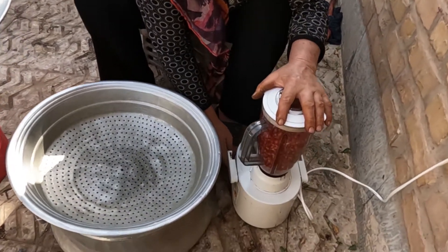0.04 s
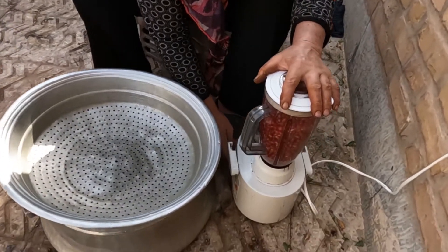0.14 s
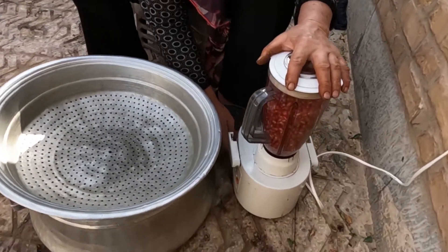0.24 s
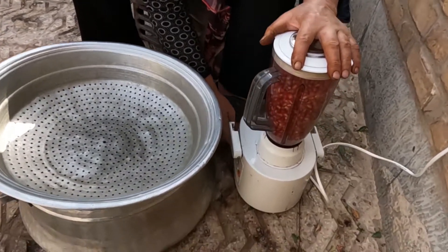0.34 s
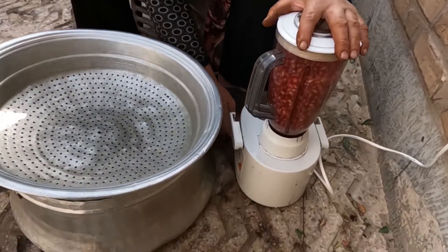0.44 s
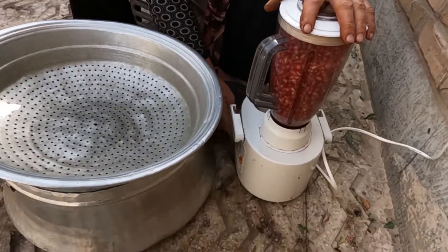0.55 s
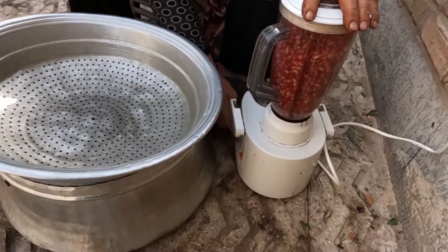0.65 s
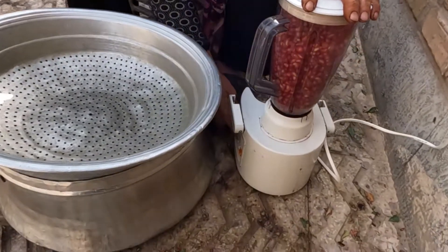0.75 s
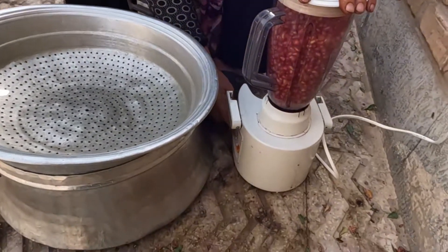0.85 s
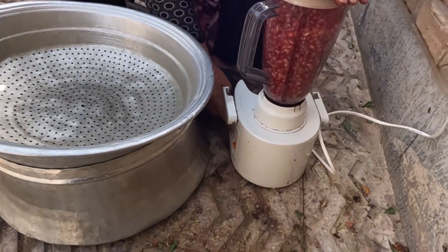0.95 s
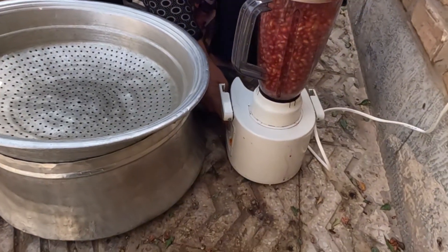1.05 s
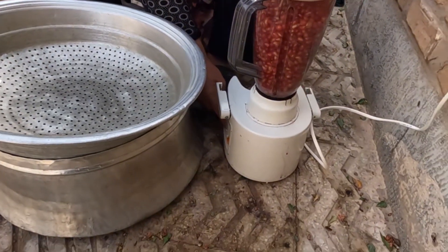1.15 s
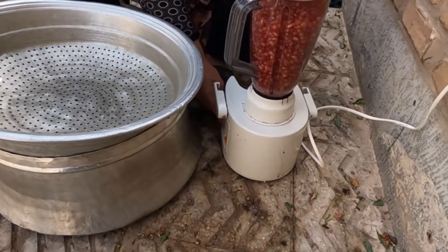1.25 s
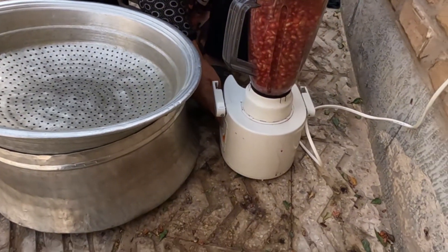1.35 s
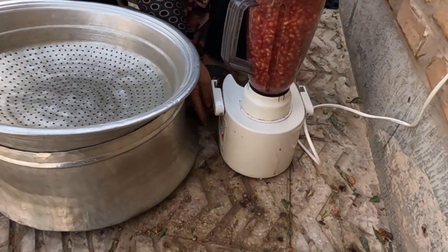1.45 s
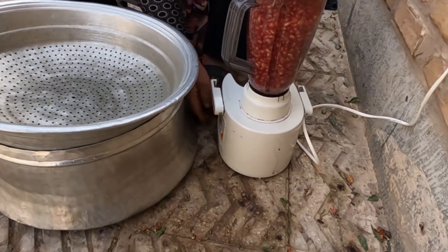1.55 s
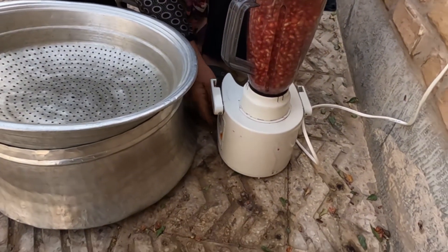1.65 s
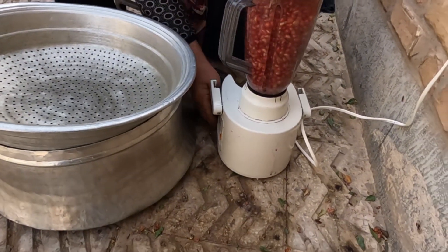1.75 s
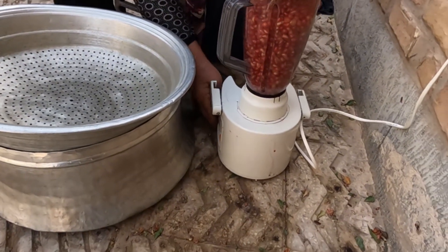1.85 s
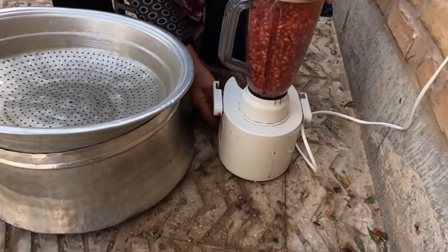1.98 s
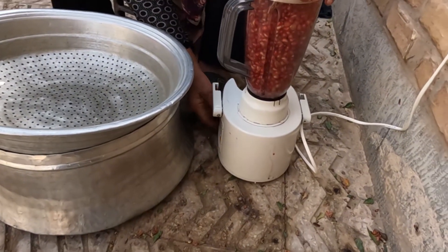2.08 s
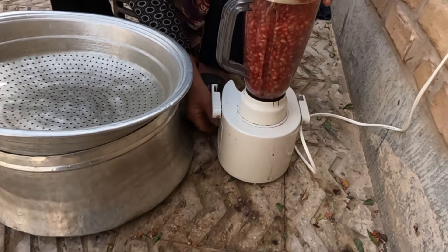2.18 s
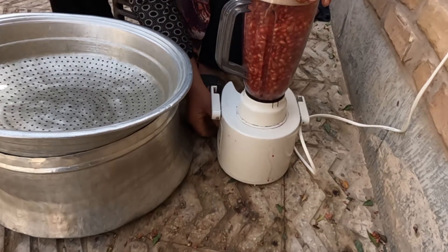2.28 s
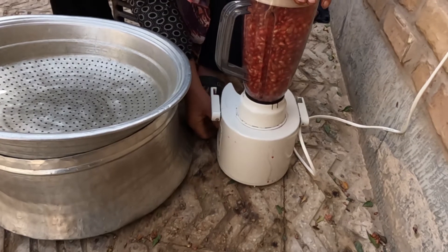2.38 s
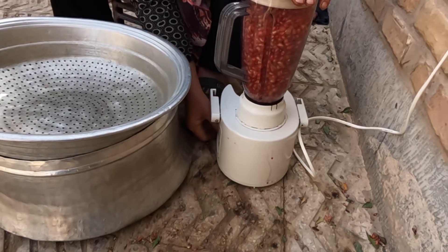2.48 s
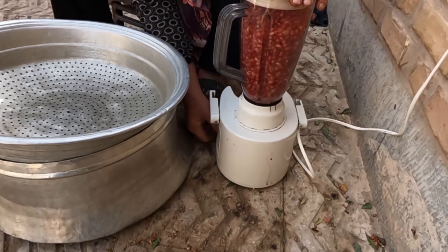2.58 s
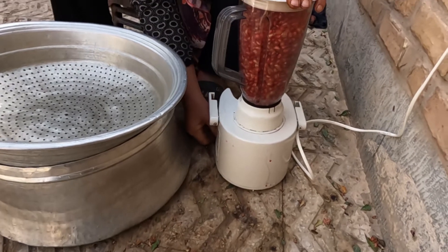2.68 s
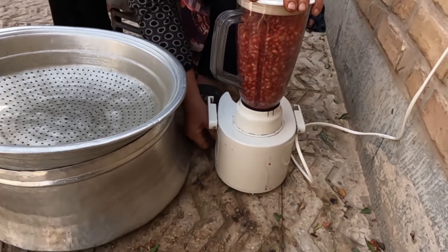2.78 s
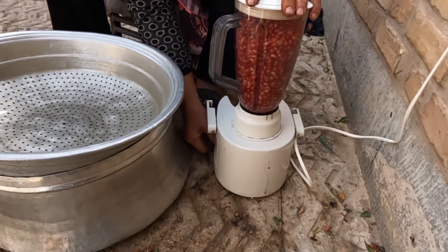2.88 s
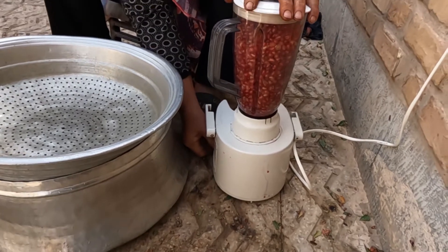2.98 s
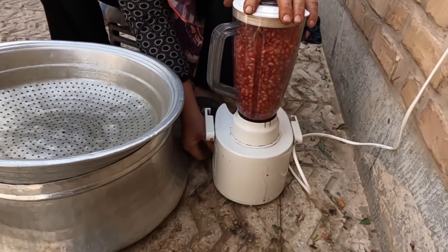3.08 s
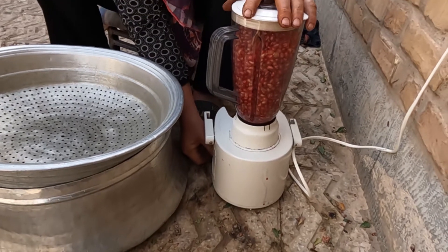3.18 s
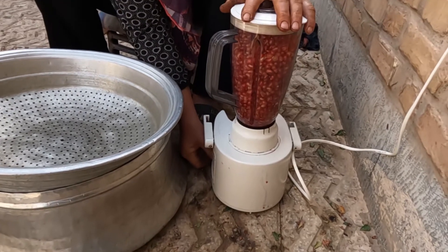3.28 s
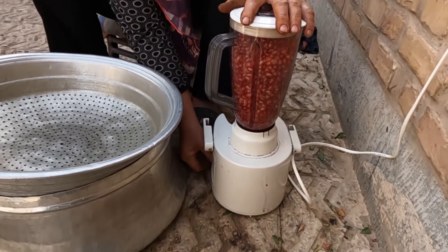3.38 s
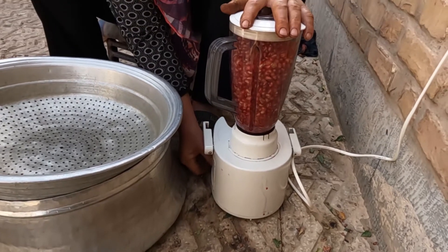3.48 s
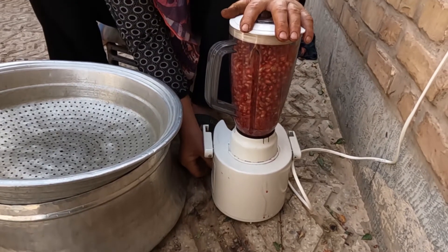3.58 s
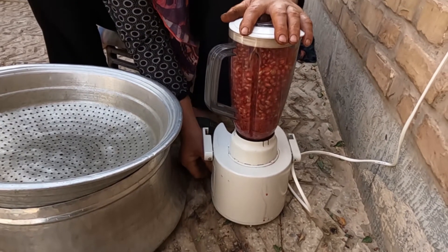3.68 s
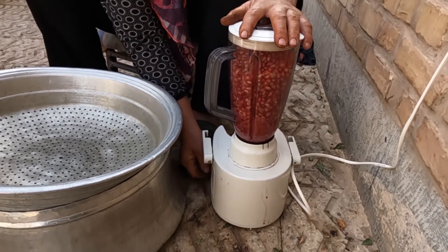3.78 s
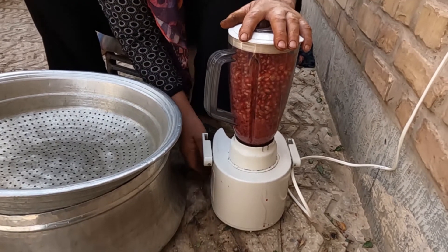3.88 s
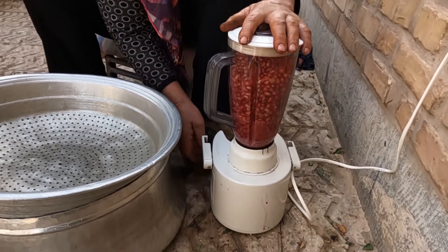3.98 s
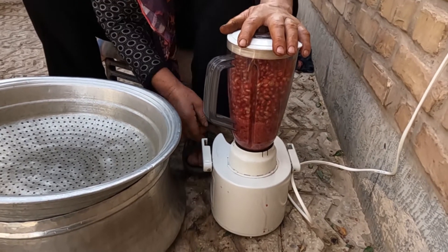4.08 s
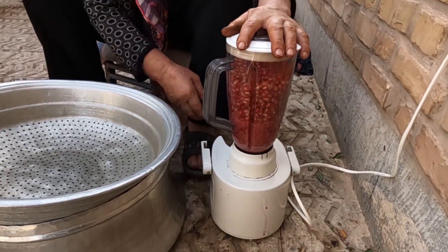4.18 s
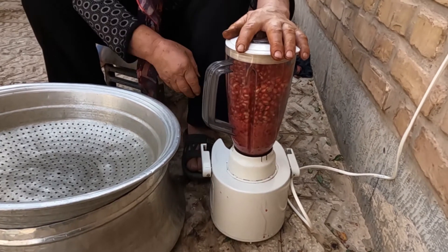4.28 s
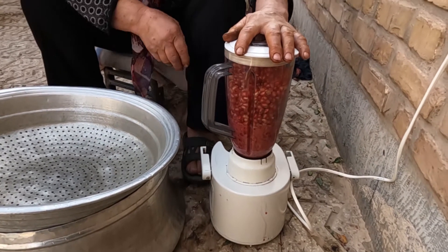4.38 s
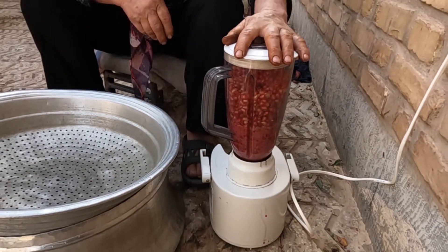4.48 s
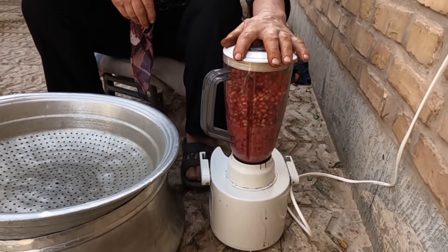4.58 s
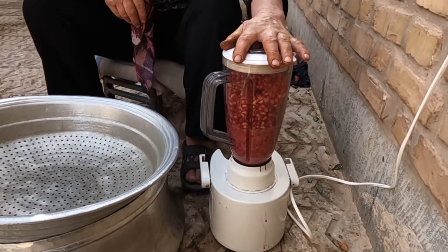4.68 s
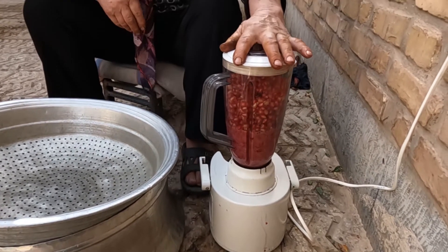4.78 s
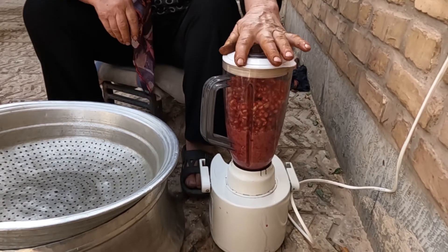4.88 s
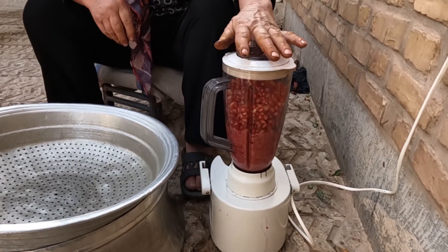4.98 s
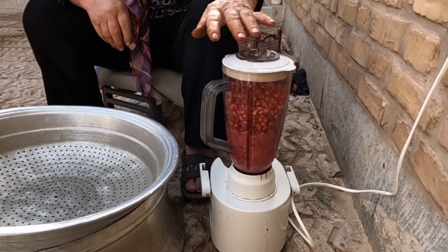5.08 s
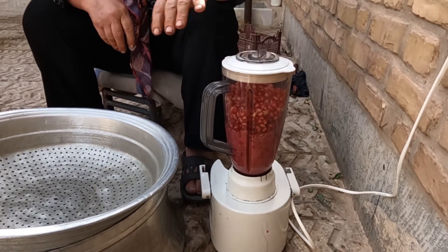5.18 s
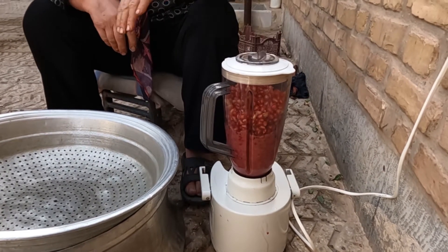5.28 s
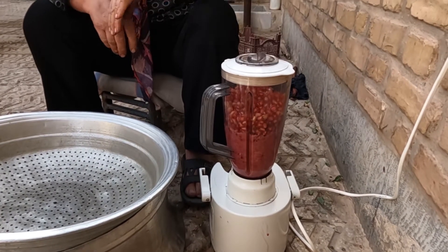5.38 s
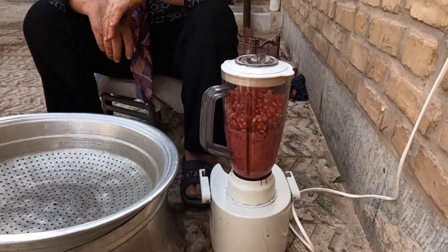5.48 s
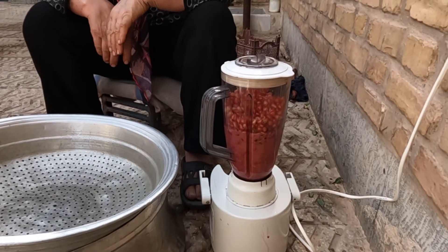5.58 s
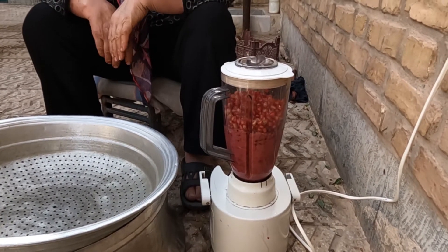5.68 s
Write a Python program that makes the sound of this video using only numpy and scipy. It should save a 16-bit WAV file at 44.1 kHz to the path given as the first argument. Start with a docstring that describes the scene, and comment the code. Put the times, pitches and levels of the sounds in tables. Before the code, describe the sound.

A close stereo outdoor scene in a small paved yard with hard walls and a short diffuse echo. For the first second there is mainly low, gusty wind rumble and a faint distant wash, with barely audible ticks. From about 1.0 to 1.3 seconds the plastic jar clacks on its heavy base, strongest near 1.25, with soft rubs and dull low bumps. Sparser knocks and scrapes follow, with another cluster around 1.8 to 2.1 and small taps at 2.3 and 2.5. A crisp switch snap comes at 2.65, then a hard jolt at 2.81 as the motor jerks into life. It instantly becomes a very loud, rough roar: chopping blades, dense seed crackle, bright spray and brush whirr, with tiny dips before 3.3. From 4 seconds the pulp thickens, the motor's pitch slides down by about a third, and low churning and drone swell, continuing to the end around 5.75.

```python
"""In a paved yard beside a brick wall, a blender full of fruit stands close to a two-port microphone.
Hands shift the jar: knocks and rubs are noise bursts and slips ringing the housing and base, bumps are short tones.
The switch snaps its panel; then blade chops, seed impacts, splinters and brush whirr ring the filled jar.
Thickening pulp slows the motor and raises the churning noise and the drone of the shaft.
Behind it a breeze rumbles on the microphone over a faint wash, both shaped noise; the yard adds a short echo."""
import sys
import numpy as np
from scipy import signal
from scipy.fft import rfft, irfft, next_fast_len
from scipy.io import wavfile
from scipy.ndimage import uniform_filter1d, map_coordinates

SR = 44100
rng = np.random.default_rng(int(sys.argv[2]) if len(sys.argv) > 2 else 0)


def persist_wave(psi):
    """Save psi, clipped to +-1, as 16-bit WAV."""
    counts = np.round(np.clip(psi, -1, 1) * 32767).astype(np.int16)
    wavfile.write(sys.argv[1], SR, np.atleast_2d(counts).T)


N = 253134

# lid and plastic housing, struck from outside: (resonance [Hz], width [Hz], level [dB])
SHELL_MODES = [(630, 81, 7.5), (958, 160, 8), (1143, 260, 5.5), (1356, 53, -2.5), (1620, 1350, -3),
               (2073, 57, -2.5), (2240, 110, 1), (2720, 370, -6), (3000, 120, -1), (3300, 2600, -4.5),
               (4650, 910, -11), (5580, 1700, -8), (7100, 1300, -11.5), (10600, 4000, -17)]
# the heavy base rocking on the paving: (resonance [Hz], width [Hz], level [dB])
BASE_MODES = [(99, 64, -3), (189, 140, -7), (288.4, 63, 4.5), (375, 140, -29), (543, 340, -13.5)]


def blender():
    """The motor turns blades that shred the fruit and churn the pulp; thickness steers both."""
    thick, age, speed, angle = motor()
    # the whole load is first thrown round: 7.5 dB around 2.915 s
    heave_db = 7.5 * swell(np.arange(N) / SR, middle=2.915, length=0.041)
    running = np.clip(age / 0.034, 0, 1)
    shredded = sloshing(shredding(thick, age, speed, angle, heave_db))
    return running * (shredded + churning(thick, angle, heave_db))


def motor():
    """The shaft spins up exponentially and sags under thick pulp; its angle is the sum of its speed."""
    # the fruit turns to pulp, which loads the motor: (time [s], thickness [0-1])
    thickness = [(3.95, 0.01), (4.45, 0.4), (5.15, .87), (5.75, 0.98)]
    start_s, spin_up_s = 2.815, 0.028
    free_turns_per_s, sag_share = 152, 0.36  # speed in loose fruit, share lost in thick pulp
    thick = curve(thickness)
    age = np.maximum(np.arange(N) / SR - start_s, 0)  # seconds since the motor got current
    speed = free_turns_per_s * (1 - np.exp(-age / spin_up_s)) * (1 - sag_share * thick)
    uneven_speed = speed * (1 + 0.01116 * wobble(14))  # lumps make the shaft waver
    angle = 2 * np.pi * np.cumsum(uneven_speed) / SR
    return thick, age, speed, angle


def shredding(thick, age, speed, angle, heave_db):
    """Blades chop at every pass, seeds pelt the wall and splinters spray, each ringing a band of the filled jar."""
    # the filled jar, driven from inside: (resonance [Hz], width [Hz], level [dB])
    jar_modes = [(274, 106, -1.5), (532, 79, -7.5), (660, 310, -10.5), (948, 167, -4), (1043, 76, -3.5),
                 (1173, 170, -3), (1290, 98, -12), (1411, 316, -3), (1742, 96, -5), (2017, 380, -4),
                 (2186, 196, -2.5), (2600, 510, -2.5), (3060, 360, -0.8), (3296, 270, -0.5),
                 (3900, 1470, -10), (5380, 1160, -7.5), (6050, 900, -8.5), (7350, 1360, -11.5),
                 (9540, 2400, -20), (10760, 2700, -20), (12900, 2000, -20)]
    t = np.arange(N) / SR
    grip_db = blade_grip(t, age)
    chop_db = -25 - 2.5 * thick + 0.58 * grip_db + 0.49 * heave_db
    seed_db = -21.5 - 0.5 * thick + grip_db
    seed_db += 1.6 * np.exp(-age / 0.29)  # whole seeds hit hardest
    spray_db = -31.5 - 4 * thick ** 4 + grip_db  # smothered only once the pulp is thick

    blades = 4
    chops = 0.62 * impacts(blades * speed, scatter=0.2, spread_db=0) + 0.5 * rng.standard_normal(N)
    seeds = impacts(np.full(N, 3500), scatter=2, spread_db=4)
    splinters = impacts(np.full(N, 1400), scatter=2, spread_db=6.5) + 1.37 * rng.standard_normal(N)
    rough = whirr(t, angle)
    clumps = amp(0.7 * np.tanh(wobble(110)))  # shared by all three bands

    def jar(x, low_hz, high_hz):
        """Fruit reaches the blades unevenly, partly in step with the shaft, before the jar rings."""
        morsels = amp(3.14 * np.tanh(wobble(220)))
        feed = clumps * morsels * (1 + 0.13 * np.cos(angle))
        return unit_while(through(feed * x, ringing(jar_modes, low_hz, high_hz)), age > 0)

    flesh = amp(chop_db) * jar(chops + rough, low_hz=340, high_hz=1890)
    crunch = amp(seed_db) * jar(seeds + 0.36 * chops + rough, low_hz=1730, high_hz=3950)
    fizz = amp(spray_db) * jar(splinters + 0.5 * seeds + rough, low_hz=4400, high_hz=10700)
    return flesh + crunch + fizz


def blade_grip(t, age, bite_s=0.099, bite_db=23.5, surge_db=0.68):
    """How well the blades grip the fruit, in dB: it rises as fruit is drawn in, surges, and dips in air pockets."""
    # the blades briefly spin in an air pocket: (middle [s], length [s], level change [dB])
    pockets = [(3.046, 0.014, -6), (3.219, 0.0083, -5.5), (3.286, 0.015, -6)]
    grip_db = -bite_db * np.clip(1 - age / bite_s, 0, 1)
    grip_db += surge_db * wobble(21.916)
    for middle, length, db in pockets:
        grip_db += db * swell(t, middle, length)
    return grip_db


def whirr(t, angle, level=0.39, size=320):
    """Brushes and coupling repeat a rough pattern at every turn, which changes slowly as time passes."""
    pattern = rng.standard_normal((size, size))
    turns = angle / (2 * np.pi)
    # rows pass at 3 a second, columns once round per turn
    return level * unit(map_coordinates(pattern, [3 * t, turns * size], mode="grid-wrap"))


def churning(thick, angle, heave_db):
    """The churning mass is low noise plus the drone of the unbalanced rotor, louder in thick pulp."""
    # unbalance of the blades: (shaft order [1], level against the churning [dB])
    whirl = [(1, -9.5), (2, -16.5), (3, -7.5), (4, -15), (5, -11)]
    # colour of the churning pulp: (frequency [Hz], relative level [dB per Hz])
    pulp_colour = [(25, -47), (50, -14.5), (100, -11), (150, -5), (210, -7.5), (285, 1.5), (340, -5),
                   (420, -10), (700, -13), (1500, -78)]
    churn_db = -37 + 9 * thick ** 1.4 + heave_db
    pulp = amp(wobble(7.3)) * noise(pulp_colour)
    drone = sum(amp(db + 2.3 * wobble(8.3)) * np.cos(order * angle) for order, db in whirl)
    return amp(churn_db) * (pulp + drone)


def sloshing(x, depth_db=1.0):
    """Pulp thrown along the wall damps now one resonance, now another."""
    z = signal.stft(x, nperseg=1024)[2]
    field = rng.standard_normal(z.shape)
    field = uniform_filter1d(field, size=4, axis=0)  # smooth over frequency
    field = uniform_filter1d(field, size=6, axis=1)  # and over time
    return signal.istft(z * amp(depth_db * unit(field)), nperseg=1024)[1][:N]


def switch(trim_db=1):
    """The sprung switch rings its panel."""
    # the switch snaps over and rebounds: (time [s], level before trim [dB], t60 [s])
    snaps = [(2.642, -12.5, 0.028), (2.661, -24.5, 0.047)]
    # the switch and its panel: (resonance [Hz], width [Hz], level [dB])
    panel_modes = [(280, 120, -2), (613, 430, -10), (1380, 330, 1.5), (2210, 320, 2), (3020, 890, -6),
                   (3570, 1400, -9.5), (5570, 1200, -15), (10200, 5000, -32)]
    panel = ringing(panel_modes, 130, 13000)
    out = np.zeros(N)
    for s, db, t60 in snaps:
        snap = amp(db + trim_db) * burst(panel, t60)
        out[round(s * SR):][:len(snap)] += snap
    return out


def knocks(thump_trim_db=1.5, clack_trim_db=1.14, tick_trim_db=1, rattle_db=-24):
    """Each contact thumps the base, clacks the housing and ticks at the hard edge; the loose jar chatters on."""
    # the jar knocks on its base, last as the drive jerks it; levels before trim:
    # (time [s], thump [dB], clack [dB], tick [dB], clack centre [Hz])
    contacts = [(0.456, -71, -45.5, -60, 1440), (.522, -76, -49, -40.5, 4200), (0.756, -66, -54, -60, 2400),
                (0.977, -68, -50, -50, 3500), (1.007, -43, -26, -33, 2830), (1.082, -35.5, -26, -36, 2240),
                (1.135, -64, -43, -38.5, 3800), (1.177, -63, -52, -50, 3000), (1.201, -52, -39, -47, 2080),
                (1.249, -26.5, -19, -31.5, 2230), (1.305, -55, -45, -52, 3000),
                (1.433, -41.5, -43, -41, 2960), (1.744, -56, -52.5, -55, 2500),
                (1.804, -55, -48.5, -46, 2500), (1.896, -44, -37, -43, 2180),
                (1.929, -31.5, -28, -36, 1860), (1.948, -34, -36.5, -44, 2000),
                (2.312, -43.5, -36.5, -42, 2800), (2.515, -38, -39.5, -53, 1840),
                (2.775, -51, -38, -33.5, 2870), (2.805, -30, -33, -33, 2020), (2.813, -15, -12, -17, 2630),
                (2.826, -25.5, -16.5, -37, 1980)]
    base = ringing(BASE_MODES, 33, 930)
    wall = ringing(SHELL_MODES, 540, 5400)
    edge = ringing(SHELL_MODES, 5280, 13400)
    out = np.zeros(N)
    for s, thump, clack, tick, centre_hz in contacts:
        hit = amp(thump + thump_trim_db) * burst(base, t60=0.098)
        # the housing rings equally long after every knock
        hit += amp(clack + clack_trim_db) * burst(favour(wall, centre_hz, octaves=1.0), t60=0.045)
        hit += amp(tick + tick_trim_db) * burst(edge, t60=0.033)
        hit += amp(clack + rattle_db) * burst(favour(wall, 4200, octaves=1.4), t60=0.16)
        out[round(s * SR):][:len(hit)] += hit
    return out


def scraping(catches_per_s=90, catch_share=0.82, size=16384):
    """Every rub is a swell of tiny slips and a few harder catches that excite the housing and rock the base."""
    # the jar slides and rocks as it is settled; the bell of that length is squared below:
    # (middle [s], level [dB], bell length [s], centre [Hz], rocking of the base [dB])
    rubs = [(1.04, -50.5, .06, 2470, -60), (1.199, -57, 0.12, 3500, -65), (1.312, -72, 0.15, 4000, -56),
            (1.484, -55, 0.032, 1100, -51), (1.724, -61, 0.051, 3500, -58), (1.834, -49.5, .04, 2800, -41),
            (1.977, -52.5, 0.19, 2600, -47.5), (2.085, -46.5, 0.03, 2200, -39.5),
            (2.197, -50, 0.048, 3020, -51), (2.382, -55, 0.12, 1200, -54), (2.517, -50, 0.034, 2200, -56),
            (2.691, -44, 0.068, 1100, -52), (2.778, -45, 0.051, 900, -55)]
    wall = ringing(SHELL_MODES, 470, 18000)
    base = ringing(BASE_MODES, 105, 1140)
    t = (np.arange(size) - size // 2) / SR
    catches = impacts(np.full(N, catches_per_s), scatter=0.4, spread_db=2)
    catches = unit(through(catches, burst(np.ones(1), t60=0.022)))
    out = np.zeros(N)
    for s, db, length, centre_hz, rocking_db in rubs:
        first = round(s * SR) - size // 2
        slips = unit(rng.standard_normal(size) * amp(2.6 * rng.standard_normal(size)))
        slips = slips + catch_share * catches[first:][:size]
        contact = through(slips, wall) + 0.26 * slips  # housing plus the bare friction
        rub = amp(db) * unit(favour(contact, centre_hz, octaves=3.4))
        rock = amp(rocking_db) * unit(through(slips, base))
        out[first:][:size] += (rub + rock) * swell(t, 0, length) ** 2
    return out


def bumps():
    """A soft push through the ground rings for only a few cycles under a bell-shaped envelope."""
    # dull bumps as weight is put on the blender: (time [s], level [dB], pitch [Hz], length [s])
    pushes = [(1.209, -31, 76.6, 0.012), (1.262, -52, 116, .014), (1.472, -32, 98, 0.0082),
              (1.723, -35.5, 74, 0.0088), (1.851, -33, 96, 0.015), (1.955, -31.5, 160, 0.0065)]
    t = np.arange(N) / SR
    out = np.zeros(N)
    for s, db, pitch_hz, length in pushes:
        near = np.abs(t - s) < 4 * length
        u = t[near] - s
        tone = np.sin(2 * np.pi * (pitch_hz * u + rng.random()))
        out[near] += amp(db) * np.sqrt(2) * swell(u, 0, length) * tone
    return out


def nearby(x, lean_db=0.28, size=4096):
    """Reflections off pot, ground and wall differ between the two ports; the right port hears the jar first."""
    # reflections off pot and wall: (frequency [Hz], side level [dB])
    side_level = [(100, -78), (300, -21), (600, -17), (1200, -8.5), (3000, -10), (6000, -11),
                  (13000, -11.5)]
    ports = np.array([[-1], [1]])  # left, right
    scatter = rng.standard_normal(size) * np.exp(-np.arange(size) / SR / 0.012)
    scatter /= np.linalg.norm(scatter)
    side = filtered(through(x, scatter), lambda hz: amp(along(side_level, hz)))
    pair = np.array([x + side, x - side]) * amp(lean_db * ports)
    # phase lead [rad] grows with frequency up to 2500 Hz
    return filtered(pair, lambda hz: np.exp(1j * np.minimum(hz, 2500) * 9e-5 * ports))


def yard_echo(x):
    """The walls answer with a short diffuse tail: noise that decays at its own pace in each band."""
    # decay of the yard: (frequency [Hz], t60 [s])
    decay = [(200, 0.13), (1200, 0.6), (4000, 0.25), (12000, 0.79)]
    hz, t, z = signal.stft(rng.standard_normal((2, SR // 2)), SR, nperseg=256)
    fade = amp(-60 * t / along(decay, hz)[:, None])
    tail = signal.istft(z * fade, SR, nperseg=256)[1]
    return signal.fftconvolve(x[None], tail / np.linalg.norm(tail[0]), axes=1)[:, :N]


def breeze(trim_db=1, gust_db=2.5, apart=0.26):
    """Gusty low noise on the microphone, mostly alike at both ports and stronger at the right, which then drops."""
    # strength of the breeze: (time [s], level before gusts and trim [dB])
    strength = [(0, -42.5), (.35, -41), (.85, -45), (1.15, -39.5), (1.35, -43.5), (1.85, -39.5),
                (2.05, -45), (2.8, -47), (3.1, -61)]
    # colour of the wind on the microphone: (frequency [Hz], relative level [dB per Hz])
    rumble = [(12, 3), (25, 7), (45, -5), (70, -3), (105, -9), (150, -17), (250, -25), (450, -38.5),
              (800, -72), (1600, -100)]
    level_db = curve(strength) + gust_db * wobble(8.65) + trim_db
    ports = noise(rumble) + apart * np.array([noise(rumble), noise(rumble)])
    return amp(level_db) * ports * amp(np.array([[-1], [1]]))


def distant_wash(trim_db=-1):
    """The faint steady noise of the surroundings, wide and slightly to the left, where the yard is open."""
    # level of the background: (time [s], level before trim [dB])
    distant = [(0, -57.5), (.27, -65.5), (.9, -61.5), (1.6, -62)]
    # colour of the distant background: (frequency [Hz], relative level [dB per Hz])
    yard_colour = [(200, -3), (500, -1), (850, -13.5), (1130, 4.5), (1330, -1.5), (1580, 0), (2200, -11.5),
                   (3300, -11.5), (5200, -9), (7300, -12), (8700, -20), (12300, -18.5), (15000, -32)]
    ports = 0.62 * noise(yard_colour) + 0.67 * np.array([noise(yard_colour), noise(yard_colour)])
    return amp(curve(distant) + trim_db) * ports * amp(np.array([[1], [-1]]))


def ringing(modes, low_hz, high_hz, size=4096):
    """Causal (minimum-phase) impulse response of a body's resonances within a band, of energy 1."""
    hz = np.fft.rfftfreq(size, 1 / SR) + 1
    power = 0
    for centre, width, db in modes:
        detuning = (hz ** 2 - centre ** 2) / (hz * width)
        power = power + amp(db) ** 2 / (1 + detuning ** 2) ** 2
    power = power / (1 + (low_hz / hz) ** 10) / (1 + (hz / high_hz) ** 10)
    # folding the cepstrum puts all the energy after the blow
    cepstrum = irfft(np.log(power + 1e-12) / 2)
    fold = np.r_[1, np.full(size // 2 - 1, 2), np.zeros(size // 2)]
    ring = irfft(np.exp(rfft(cepstrum * fold)))
    return ring / np.linalg.norm(ring)


def burst(ring, t60, rise=0.00011, size=8192):
    """A blow that swells as the plastic yields, then dies away in the body; it peaks near rms 1."""
    t = np.arange(size) / SR
    envelope = np.exp(-np.log(1000) * t / t60) * (1 - np.exp(-t / rise))
    x = through(envelope * rng.standard_normal(size), ring)
    return x * np.linalg.norm(envelope) / np.linalg.norm(x)


def impacts(rate, scatter, spread_db):
    """Impulses at a rate per second, displaced by scatter (in intervals), of random size and sign, rms 1."""
    count = np.cumsum(rate) / SR
    chance = rng.standard_normal((int(count[-1]), 3))
    at = np.searchsorted(count, np.arange(len(chance)) + scatter * chance[:, 0])
    size = amp(spread_db * np.minimum(chance[:, 1], 2)) * np.sign(chance[:, 2])
    return unit(np.bincount(at, size, N + 1)[:N])


def favour(x, centre_hz, octaves):
    """The place and hardness of a contact favour the resonances around one frequency."""
    edges = np.clip(centre_hz * 2 ** (octaves * np.array([-0.5, 0.5])), 20, SR / 2 - 100)
    return signal.lfilter(*signal.butter(1, edges, "bandpass", fs=SR), x)


def through(x, ring):
    """Excite a resonating body with x."""
    return signal.fftconvolve(x, ring)[:len(x)]


def noise(spectrum):
    """Noise of rms 1 with the given colour."""
    return unit(filtered(rng.standard_normal(N), lambda hz: amp(along(spectrum, hz))))


def filtered(x, response):
    """x times a response of frequency."""
    n = x.shape[-1]
    m = next_fast_len(n + 8192, True)
    return irfft(rfft(x, m) * response(np.fft.rfftfreq(m, 1 / SR)), m)[..., :n]


def wobble(rate):
    """A smooth random curve, rate knots a second."""
    return map_coordinates(rng.standard_normal(int(N * rate / SR) + 4), [np.arange(N) * rate / SR])


def swell(t, middle, length):
    """A bell-shaped rise and fall of height 1."""
    return np.exp(-((t - middle) / length) ** 2)


def curve(points):
    """(s, value) points read at every sample."""
    s, values = np.transpose(points)
    return np.interp(np.arange(N) / SR, s, values)


def along(points, hz):
    """(Hz, value) points read on a log axis."""
    f, v = np.transpose(points)
    return np.interp(np.log(hz + 1), np.log(f + 1), v)


def unit(x):
    """Scale to rms 1."""
    return x / np.sqrt(np.mean(x ** 2) + 1e-20)


def unit_while(x, on):
    """Scale to rms 1 over the samples marked on."""
    return x / np.sqrt(np.mean(x[on] ** 2) + 1e-20)


def amp(db):
    """Decibels to gain."""
    return 10 ** (np.asarray(db) / 20)


def scene(echo_db=-13):
    """The blender and its handling close by, the yard's echo, and the breeze and wash behind."""
    machine = blender() + switch() + knocks() + scraping()
    close = nearby(machine) + bumps()
    return close + amp(echo_db) * yard_echo(machine) + breeze() + distant_wash()


def record(dry):
    """The microphone's treble fades around 14 kHz, and nothing passes above 15.8 kHz."""
    return filtered(dry, lambda hz: (hz < 15800) / np.sqrt(1 + (hz / 14000) ** 20))


dry = scene()
out = record(dry)
persist_wave(out)
```